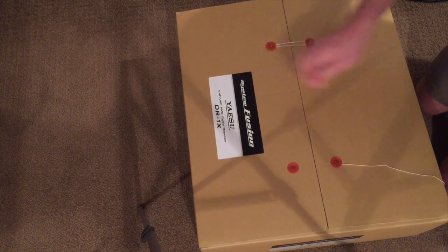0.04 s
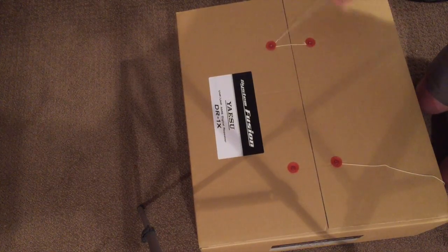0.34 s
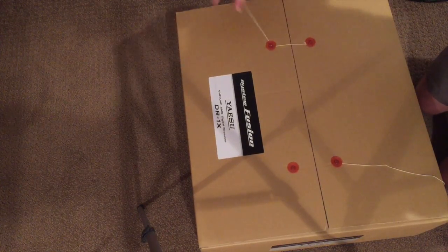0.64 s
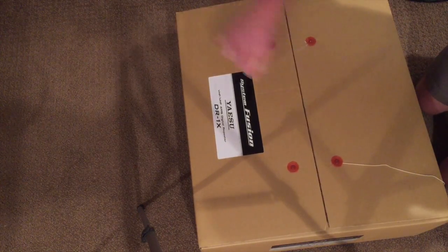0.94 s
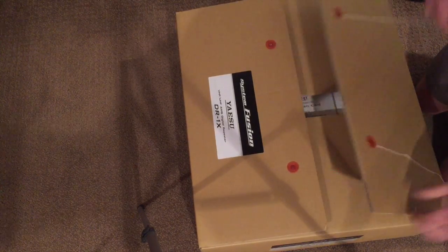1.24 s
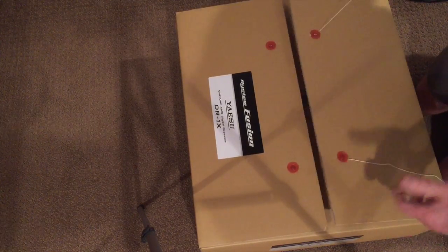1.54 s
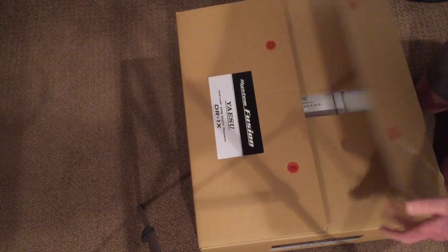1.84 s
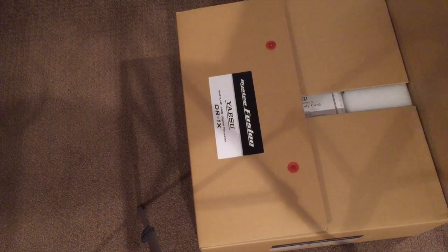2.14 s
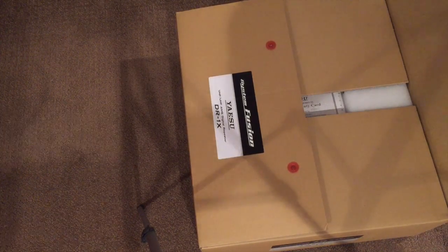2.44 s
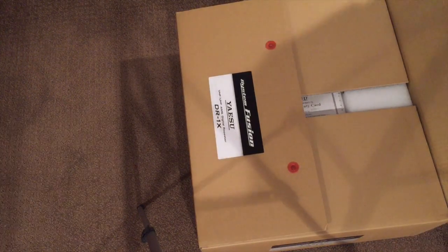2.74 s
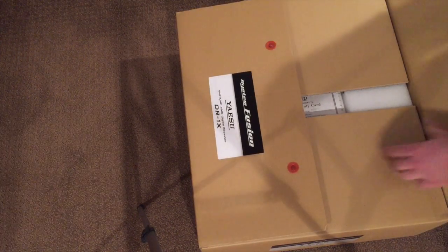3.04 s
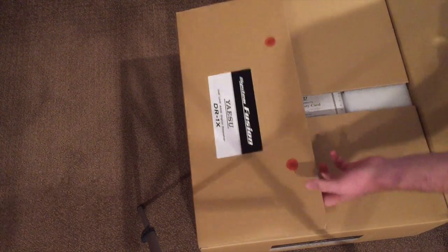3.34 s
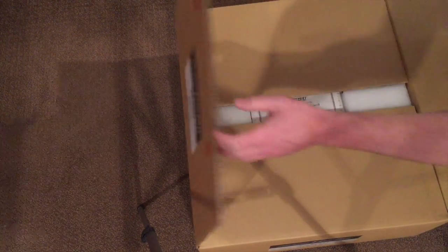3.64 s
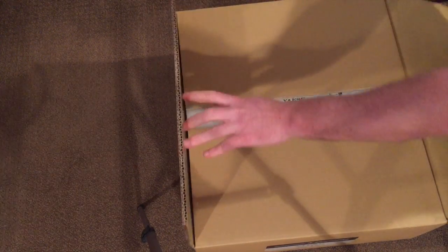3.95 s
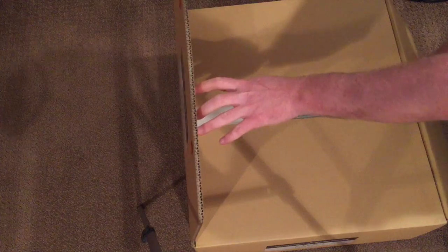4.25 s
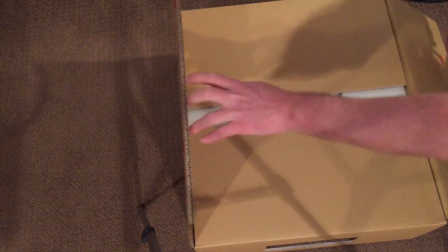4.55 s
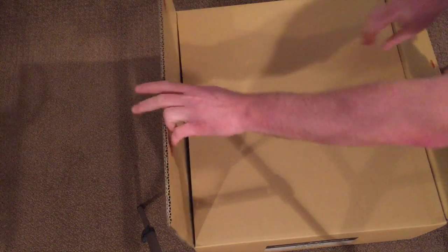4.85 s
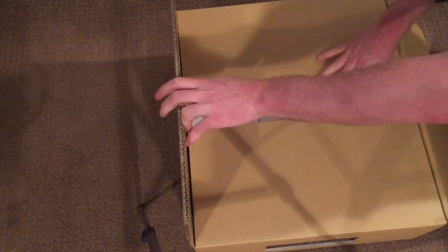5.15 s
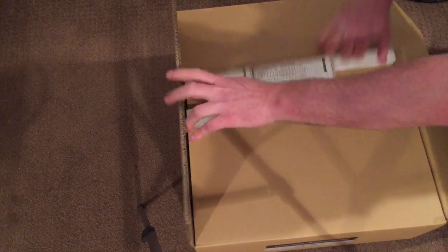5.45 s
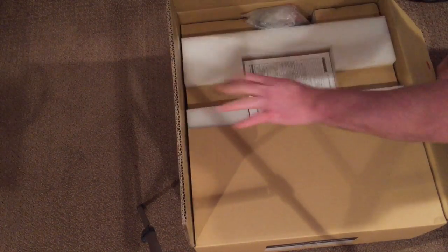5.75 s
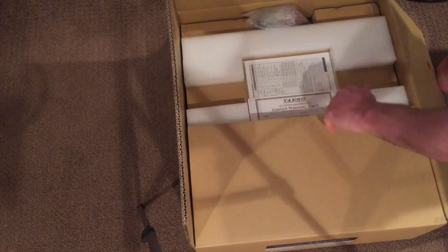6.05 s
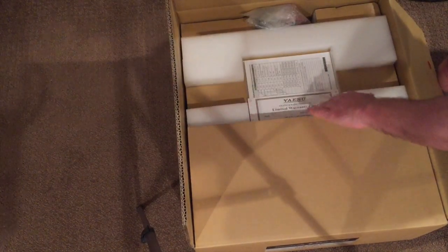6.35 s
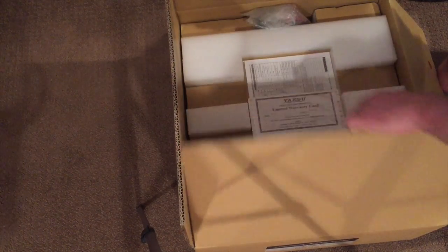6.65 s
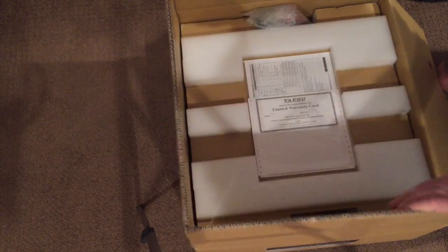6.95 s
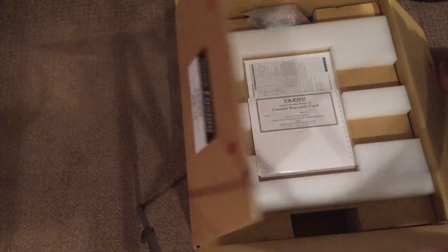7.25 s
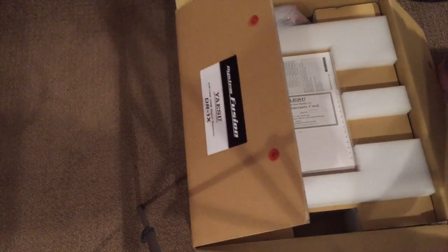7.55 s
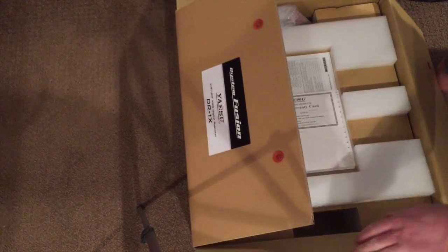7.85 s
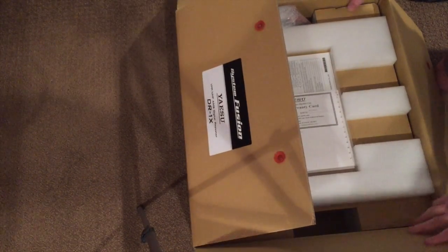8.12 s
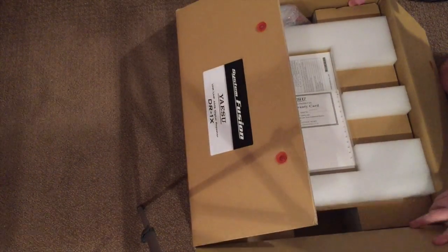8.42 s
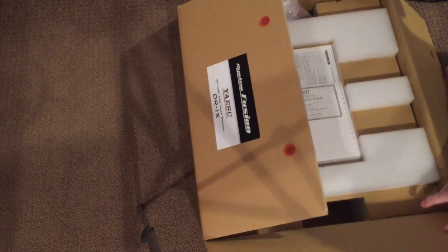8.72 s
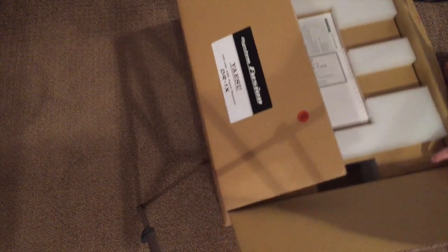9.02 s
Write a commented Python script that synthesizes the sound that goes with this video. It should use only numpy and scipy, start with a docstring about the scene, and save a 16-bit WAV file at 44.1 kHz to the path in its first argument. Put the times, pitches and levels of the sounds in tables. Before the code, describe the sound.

A string snaps against a cardboard lid, then the box's flaps are pulled back, rasping, sliding and thumping up close.

```python
"""Opening a cardboard box

A small carpeted room, one microphone close to a large corrugated box on the floor. A string is
unwound from its button and snaps against the lid; four flaps are pulled back one by one. Sliding
board rasps and hisses; hands and flap edges knock, ringing the flaps and walls. The foam packing
sticks and slips in one squeak, and near the end a cut edge drags over the next flap."""
import sys
import numpy as np
from scipy import signal
from scipy.fft import rfft, irfft
from scipy.io import wavfile
from scipy.ndimage import uniform_filter1d

SR = 44100
rng = np.random.default_rng(int(sys.argv[2]) if len(sys.argv) > 2 else 0)


def master(y):
    """Save y as 16-bit WAV."""
    cut = np.clip(np.atleast_2d(y).T, -1, 1)
    pcm = np.round(cut * 32767)  # scale
    wavfile.write(sys.argv[1], SR, pcm.astype(np.int16))


N = 409248
TIME = np.arange(N) / SR

# Levels are relative: each source applies its own trims.
# strokes of sliding board: start/s, length/s, attack/s, release/s, swell/dB, drone/dB, rasp/dB, hiss/dB
STROKES = [ (0, 0.073, 0.0018, 0.085, -13, -50, -68.5, -67),
           (0.118, 0.13, 0.041, 0.06, -2, -58.5, -61, -65),
           (0.583, 0.086, 0.054, 0.034, 10.5, -61.5, -63, -67),
           (0.767, 0.098, .015, 0.027, 3, -69.5, -62.5, -71), (1.106, 0.2, .01, .05, 1, -57.5, -80, -87),
           (1.328, 0.17, 0.0086, 0.069, -16, -47.5, -54, -60.5),
           (1.473, 0.11, 0.0081, 0.091, 2, -45.5, -70, -66),
           (1.986, .14, 0.017, 0.013, -1.5, -63, -63, -61.5),
           (2.105, .18, 0.042, 0.05, 7, -61, -52.5, -52.5), (2.262, 0.45, .02, 0.04, 3, -63, -63, -57.5),
           (2.647, 0.41, 0.063, 0.019, -9.5, -64, -60.5, -55),
           (2.959, 0.29, 0.012, 0.085, -28.5, -56, -67, -69),
           (3.211, 0.2, 0.011, 0.015, -0.5, -46.5, -59, -61),
           (3.342, 0.19, 0.0093, 0.057, -7.5, -54, -53.5, -58.5),
           (3.46, 0.21, .02, .01, 9, -64, -64, -61.5), (3.596, 0.49, .012, 0.026, 12.5, -48, -54.5, -53),
           (4.046, 0.047, .012, 0.025, 7, -36, -42, -36),
           (4.324, 0.11, 0.021, 0.019, -5.5, -68.5, -75, -80.5),
           (4.418, .2, 0.026, 0.026, -4, -55, -66.5, -64.5), (4.589, 0.21, 0.13, 0.13, 6, -40.5, -49, -48),
           (4.83, 0.19, .02, 0.053, -10.5, -58, -66.5, -65),
           (4.919, 0.56, 0.023, 0.04, -19.5, -77, -76.5, -79),
           (5.378, 0.07, 0.023, 0.017, -22, -43, -39, -49),
           (5.424, 0.29, 0.087, 0.036, -2.5, -46.5, -43.5, -41),
           (5.662, 0.17, .02, 0.062, -5.5, -51, -46, -47), (5.89, 0.24, 0.067, 0.07, 2.5, -57, -47, -48.5),
           (6.466, .2, 0.1, 0.057, -14, -49.5, -47.5, -50.5),
           (6.651, 0.095, 0.028, 0.016, 7, -48.5, -52.5, -47.5),
           (6.734, 0.13, 0.01, 0.036, -13, -35.5, -45.5, -48),
           (6.841, 0.28, 0.017, 0.12, 7, -49.5, -47.5, -51.5),
           (7.078, 0.2, 0.0067, 0.015, 12.5, -54, -47, -49.5), (7.23, 0.18, .02, 0.071, -1, -46, -51, -55),
           (7.383, .33, .03, 0.062, -5, -60.5, -69.5, -58.5), (7.665, 0.22, 0.13, 0.11, 7, -54, -60, -53),
           (7.855, 0.61, 0.11, 0.29, 6, -63, -67, -55.5), (8.376, 0.47, 0.012, 0.035, 10, -60, -64.5, -67),
           (8.652, 0.68, 0.48, 0.43, 1, -63.5, -78, -58)]
# hands and flaps meeting the box:
# t/s, touches, contact/ms, thump centre/Hz, thump/dB, flap/dB, clack/dB, crack/dB
KNOCKS = [ (0.143, 1, 2.6, 127, -62, -51, -50, -46), (0.929, 1, 2.1, 118, -68, -78, -73, -57),
          (0.990, 1, 1.7, 114, -42.5, -44, -34.5, -41), (1.11, 1, 1.3, 131, -53.5, -45.5, -47, -64),
          (1.147, 1, 9, 188, -54, -46, -45, -57.5), (1.268, 1, 1.1, 155, -54, -60.5, -54, -62),
          (1.331, 2, 1.1, 185, -41.5, -44, -48.5, -47), (1.374, 1, 4, 170, -46, -63, -63, -42.5),
          (1.405, 1, 1.4, 176, -49.5, -68, -54, -60), (1.485, 1, 0.9, 142, -46, -42.5, -47.5, -45),
          (1.516, 1, 0.69, 138, -43, -51, -50, -36.5), (1.994, 1, 1.4, 124, -55, -67, -73, -58),
          (2.029, 1, 0.95, 92.6, -53.5, -63, -54, -44.5), (2.238, 1, 4.9, 137, -53, -62, -52, -37),
          (2.566, 1, 5.3, 226, -64, -52, -49, -54), (2.616, 1, 1.4, 148, -46.5, -58, -53.5, -54),
          (2.969, 2, .7, 151, -32, -40, -47, -58), (3.218, 1, 1, 185, -57, -58, -57, -57),
          (3.241, 1, 1.5, 224, -51, -42, -46.5, -61), (3.347, 1, 0.81, 109, -39.5, -45.5, -50, -42.5),
          (3.423, 1, 3.2, 137, -51, -50.5, -46.5, -49.5), (3.633, 1, 3.7, 123, -46.5, -43, -40, -42.5),
          (3.68, 1, 1.4, 168, -43.5, -56, -72, -70), (3.857, 1, 0.74, 125, -43, -49, -55, -47),
          (3.896, 1, 1.2, 131, -50, -41.5, -41.5, -30), (4.021, 1, 2, 153, -38, -48, -57, -35),
          (4.068, 3, 1.1, 168, -26.5, -35.5, -35, -31), (4.424, 1, 0.66, 121, -53, -46.5, -58, -73),
          (4.709, 1, 0.85, 127, -46, -36.5, -48, -36), (4.744, 1, 3, 122, -37, -43, -52, -43.5),
          (4.856, 1, 3.7, 150, -63, -52, -65, -91), (5.21, 1, 1.6, 77, -57, -64, -68, -83),
          (5.256, 1, 8.2, 150.4, -70.5, -58, -73.5, -66), (5.335, 1, 4.2, 118, -45.5, -51.5, -48.5, -42),
          (5.378, 1, 6.6, 168, -65, -40, -39.5, -35), (5.408, 1, .6, 171, -36, -34, -35, -25.5),
          (5.436, 1, 1.3, 147, -36.5, -66, -63, -60), (5.667, 1, 9.9, 138, -38, -34.5, -37, -32.5),
          (5.683, 1, 1.1, 129, -37.5, -42, -41, -30), (6.043, 1, 2.6, 133.7, -39, -47, -62, -51),
          (6.077, 1, 1.6, 117, -40, -43, -43, -38.5), (6.449, 1, 5.9, 109, -42.5, -55.5, -66, -65),
          (6.509, 1, 8.2, 97, -48.5, -48, -54, -46.5), (6.738, 2, 3.4, 207, -32.5, -31, -38.5, -61),
          (6.779, 3, 5, 193, -39.5, -41, -34.5, -40.5), (6.84, 1, 1.6, 122, -49, -41, -40.5, -42),
          (6.891, 2, 1.5, 117, -60, -37.5, -39.5, -42), (6.979, 1, 1.9, 204, -50, -30, -35.5, -36),
          (7.036, 1, 1.5, 176, -39.5, -38, -35, -39.5), (7.242, 1, 1.9, 160, -41.5, -33, -27, -23),
          (7.309, 1, 0.8, 184, -54, -58, -35, -35.5), (7.453, 1, 4.2, 185, -52, -48, -41.5, -48.5),
          (8.086, 1, 1, 162, -56.5, -69, -72, -60), (8.189, 1, 3.9, 150, -74, -72, -53.5, -52),
          (8.367, 1, 1.1, 133, -48.5, -68, -67, -60), (8.422, 1, 5.4, 151, -61, -77, -59.5, -53),
          (9.188, 1, 0.76, 210, -58.5, -56.5, -67, -92)]
# noise spectra: f/Hz, level/dB
DRONE_SPECTRUM = [(35, -15.5), (70, 4), (120, -2), (155, 6.5), (215, -5.5), (290, -4.5), (440, -12),
                  (550, -3), (720, -42), (1100, -20)]  # rubbed box walls
RASP_SPECTRUM = [(400, -17), (700, -22.5), (1100, -3.5), (1500, -1.5), (2200, -2.5), (3200, -1.5),
                 (4300, 0), (6500, -9.5), (12000, -38.5)]  # flutes of the board
HISS_SPECTRUM = [(2000, -50), (3500, -5.5), (4600, 0.5), (5800, 4), (7500, -1), (9000, 2.5), (10300, -2),
                 (11500, 0.5), (15000, -4.5)]  # sliding fibres
CRACK_SPECTRUM = [(1100, -16.5), (1800, -7.5), (2600, -4), (4000, -3), (5600, -1.5), (7500, -7.5),
                  (9000, -8.5), (10300, -10), (15000, -14.5)]  # fibres struck or letting go
SNAP_SPECTRUM = [(700, -5), (1500, -2), (2800, -9.5), (4300, -7), (6000, 0), (7200, -11.5), (8300, 1.5),
                 (10300, -10), (15000, -6.5)]  # string hitting the lid
EDGE_SPECTRUM = [(600, -8), (1100, -1.5), (2000, 1), (3300, -0.5), (4500, -3), (6500, -9.5), (12000, -23)]  # dragged cut edge
ROOM_TONE_SPECTRUM = [(20, -15), (55, -2), (170, -8), (300, -12), (700, -17), (1500, -14.5), (4000, -23.5),
                      (15000, -26.5)]  # the quiet room
# resonances of the cardboard: f/Hz, width/Hz, level/dB
FLAP_PEAKS = [(291, 20, 2), (351, 34, 3), (414.4, 49, 0), (541, 99, -2), (602.4, 30, 2.5), (709, 69, -5.5)]  # a single flap bending
BOARD_PEAKS = [(887, 56, -0.5), (1076, 67, 6), (1216, 280, -1.5), (1460, 110, 0), (1597, 130, -5),
               (2040, 390, -3)]  # stiff board near the contact
# ringing modes: f/Hz, level/dB, T60/s
BOX_MODES = [(55.4, -6.5, 0.032), (75.4, -0.5, .11), (100.5, 0, 0.16), (129.4, 1, .11), (158.1, -1.5, 0.19),
             (172.7, -4.5, 0.24), (197.6, 4.5, 0.094), (231.6, -2, 0.15)]  # the walls and the air between them
LID_MODES = [(160, -41, .2), (235, -35, 0.11), (307, -28, .1), (335, -25.5, 0.093), (546, -23, .09),
             (596, -23.5, 0.11), (1107, -24, 0.041), (1560, -35, 0.11), (1852, -29.5, 0.072)]  # the lid under the string
# foam dragged along a flap: t/s, f/Hz, level/dB
SQUEAK_CURVE = [(5.45, 1100, -88), (5.475, 1193, -41), (5.495, 1164, -48), (5.52, 1357, -48),
                (5.55, 1546, -39), (5.575, 1540, -69)]
# one flap's edge on another: t/s, level/dB
EDGE_SLIDE = [(8.57, -75), (8.6, -55.5), (8.66, -63.5), (8.76, -55), (8.86, -56.5), (8.98, -53),
              (9.15, -57.5), (9.21, -73), (9.24, -81)]  # curve of the sliding force
EDGE_CATCHES = [(8.603, -56), (8.612, -59), (8.645, -50), (8.67, -55), (8.678, -46)]  # catches before it runs free
# reflections off nearby flaps and walls: delay/ms, level/dB
NEAR_REFLECTIONS = [(1.1, -30.5), (2.3, -20.5), (3.4, -20), (5.2, -17.5)]


def from_db(db):
    return 10 ** (np.asarray(db) / 20)


def unit_rms(x):
    return x / np.sqrt(np.mean(x ** 2) + 1e-20)


def unit_burst(x, seconds):
    """Scales a burst so that its loudest stretch of this length has rms 1."""
    power = uniform_filter1d(x ** 2, int(seconds * SR), mode="constant")
    return x / np.sqrt(power.max() + 1e-20)


def add(out, start_s, burst):
    i = int(start_s * SR)
    out[i:i + len(burst)] += burst[:N - i]


def in_time(rows):
    """Each column of a curve at every sample."""
    times, *columns = np.transpose(rows)
    return [np.interp(TIME, times, column) for column in columns]


def drift(rate_hz):
    """Smooth random wander; rms 1."""
    return unit_rms(np.interp(TIME * rate_hz, np.arange(4000), rng.standard_normal(4000)))


def colour(x, spectrum):
    """Gives a steady noise a spectrum that falls away past both ends; rms 1."""
    hz, db = np.transpose(spectrum)
    log_hz = np.log(np.arange(N // 2 + 1) * SR / N + 1)
    beyond = np.maximum(np.log(hz[0]) - log_hz, 0) + np.maximum(log_hz - np.log(hz[-1]), 0)
    gain = from_db(np.interp(log_hz, np.log(hz), db) - 20 * beyond)
    return unit_rms(irfft(rfft(x) * gain, N))


def slips(spread_db):
    """Countless tiny slips of paper fibres, uneven in size."""
    return rng.standard_normal(N) * from_db(spread_db * np.clip(drift(400), -2.5, 2.5))


def resonate(x, peaks):
    """Parallel resonances with alternating signs."""
    out = 0
    for k, (hz, width, db) in enumerate(peaks):
        r = np.exp(-np.pi * width / SR)
        gain = (-1) ** k * from_db(db) * (1 - r * r) / 2
        poles = [1, -2 * r * np.cos(2 * np.pi * hz / SR), r * r]
        out = out + gain * signal.lfilter([1, 0, -1], poles, x)
    return out


def soften(x, top_hz):
    """Paper damps short bending waves, so the ringing has a steep upper edge."""
    return signal.sosfilt(signal.butter(4, top_hz, fs=SR, output="sos"), x)


def stroke_gains(settle_db=-20.5, settle_s=0.035):
    """Gains of drone, rasp and hiss: a stroke speeds up, swells or fades, slows; the board settles."""
    power = np.zeros((3, N))
    for start, length, attack, release, swell_db, *levels_db in STROKES:
        t = TIME[:int(length * SR)]
        speeding = np.sin(np.pi / 2 * np.clip(t / attack, 0, 1))
        slowing = np.sin(np.pi / 2 * np.clip((length - t) / release, 0, 1)) ** 2
        tilt_db = swell_db * (t / length - 0.5)
        for layer, db in zip(power, levels_db):
            add(layer, start, (speeding * slowing * from_db(db + tilt_db)) ** 2)
    decay = np.exp(-1 / (settle_s * SR))
    settling = signal.lfilter([1 - decay], [1, -decay], power + 1e-18)
    return np.sqrt(power + from_db(settle_db) ** 2 * settling)


def rubbed_resonances(peaks, patchy_db=6.5):
    """Friction drives resonances, each swelling and fading as the contact travels; rms 1."""
    force = slips(4.7)
    ringing = sum(resonate(force, [peak]) * from_db(patchy_db * drift(20)) for peak in peaks)
    return unit_rms(soften(ringing, top_hz=2400))


def crackle(per_s=70, size_db=4.5, tick_s=0.0008):
    """Single fibres catch and let go with dry ticks; rms 1."""
    catches = rng.random(N) < per_s / SR
    sizes = from_db(size_db * np.minimum(rng.exponential(1, N), 3))
    ticks = signal.lfilter([1], [1, -np.exp(-1 / (tick_s * SR))], catches * sizes + 1e-18)
    return colour(ticks * rng.standard_normal(N), CRACK_SPECTRUM)


def rubbing(judder_db=1.0):
    """Sliding board drives walls and flaps, rasps on the flutes, hisses at the fibres; the grip judders."""
    drone, rasp, hiss = stroke_gains()
    walls = from_db(-4) * colour(slips(1.5), DRONE_SPECTRUM)
    flaps = from_db(-8.5) * rubbed_resonances(FLAP_PEAKS)
    flutes = from_db(-2.5) * colour(slips(1), RASP_SPECTRUM)
    board = from_db(-4) * rubbed_resonances(BOARD_PEAKS)
    fibres = from_db(-0.77) * colour(slips(1), HISS_SPECTRUM) + from_db(-19) * crackle()
    sliding = drone * (walls + flaps) + rasp * (flutes + board) + hiss * fibres
    return sliding * from_db(judder_db * drift(70))


def pulse(t, rise_s, fall_s):
    """Force of a contact: it creeps up as the surfaces meet, then dies away."""
    return 0.5 * (1 + np.tanh(t / rise_s - 0.5)) * np.exp(-np.maximum(t, 0) / fall_s)


def ring(t, modes, gains):
    """Decaying sines, each set off with its own strength."""
    hz, db, t60 = np.transpose(modes)[:, :, None]
    return np.sum(gains[:, None] * from_db(db - 60 * t / t60) * np.sin(2 * np.pi * hz * t), axis=0)


def near_pitch(hz, centre_hz, focus):
    """The place of a blow decides which modes answer most."""
    return 1 / (1 + (focus * np.log2(hz / centre_hz)) ** 2)


def touches(bounce_s=0.018, loss_db=3):
    """Every knock with its bounces: a loose flap lands a little weaker each time."""
    for start, count, contact_ms, thump_hz, *levels_db in KNOCKS:
        for k in range(round(count)):
            yield start + k * bounce_s, contact_ms / 1000, thump_hz, np.array(levels_db) - k * loss_db


def board_clack(t, contact_s, centre_hz, jolt_db=18):
    """A jolt and a noisy push ring the stiff board; contacts longer than 1 ms jolt it less."""
    tap = rng.standard_normal(len(t)) * pulse(t, 1.8 * contact_s, contact_s + 0.0045)
    tap[np.argmin(np.abs(t))] += from_db(jolt_db) / max(1000 * contact_s, 1)
    ringing = sum((-1) ** k * near_pitch(peak[0], centre_hz, focus=1.92) * resonate(tap, [peak])
                  for k, peak in enumerate(BOARD_PEAKS))
    return unit_burst(soften(ringing, top_hz=2100), 0.008)


def box_thump(t, rise_s, centre_hz, scatter_db=3):
    """The walls and the air inside build up after a blow and ring on."""
    mode_hz = np.array(BOX_MODES)[:, 0]
    scatter = from_db(scatter_db * rng.standard_normal(len(mode_hz)))
    gains = scatter * near_pitch(mode_hz, centre_hz, focus=3.29)
    after = np.maximum(t, 0)
    return unit_burst(ring(after, BOX_MODES, gains) * (1 - np.exp(-after / rise_s)), 0.022)


def knocks(lead_s=0.03, lag_s=0.0014):
    """A touch cracks at the surface, bends the flap, then shakes the box: low waves travel slowest."""
    out, t = np.zeros(N), TIME[:SR // 4] - lead_s
    fibres = colour(slips(5.3), CRACK_SPECTRUM)
    scuff = from_db(-15) * np.exp(-np.abs(t) / 0.005)
    for start, contact_s, thump_hz, (thump_db, flap_db, clack_db, crack_db) in touches():
        thump = box_thump(t, contact_s + 3 * lag_s, thump_hz)
        push = rng.standard_normal(len(t)) * pulse(t - lag_s, contact_s, contact_s + 0.0054)
        flap = unit_burst(soften(resonate(push, FLAP_PEAKS), top_hz=1050), 0.013)
        # a hard edge (more crack than flap) clacks higher than a soft hand
        clack = board_clack(t, contact_s, centre_hz=1160 * 2 ** (0.06 * (crack_db - flap_db)))
        grain = np.roll(fibres, -int(start * SR))[:len(t)]
        crack = unit_burst(grain * (scuff + pulse(t, contact_s, contact_s + 0.0034)), 0.0026)
        body = rng.choice([-1, 1]) * from_db(thump_db - 1) * thump + from_db(flap_db) * flap
        surface = from_db(clack_db - 0.8) * clack + from_db(crack_db - 1) * crack
        add(out, start - lead_s, body + surface)
    return out


def string_snap(at_s=0.3407, lead_s=0.003, rebound_s=0.0024):
    """The string slips off its button, the lid springs back; then a crack, a rebound and a rustle."""
    out, t = np.zeros(N), TIME[:SR // 2]
    crack, rebound, rustle = colour(slips(1), SNAP_SPECTRUM)[:3 * len(t)].reshape(3, -1)
    slip = from_db(-36) * rustle[::-1] * pulse(t, 0.00046, lead_s)
    signs = (-1.0) ** np.arange(len(LID_MODES))
    lid = ring(t, LID_MODES, signs) * (1 - np.exp(-t / lead_s))
    add(out, at_s - lead_s, slip + lid)
    add(out, at_s, from_db(-13) * unit_burst(crack * pulse(t, 0.0001, 0.0049), 0.00072))
    add(out, at_s + rebound_s, from_db(-20) * unit_burst(rebound * pulse(t, 0.0001, 0.003), 0.0013))
    add(out, at_s, from_db(-30) * rustle * pulse(t, 0.0046, 0.024))
    return out


def foam_squeak(flutter_db=3.3, waver=0.07):
    """Foam sticks and slips at an unsteady, rising rate."""
    hz, db = in_time(SQUEAK_CURVE)
    sliding = (TIME > SQUEAK_CURVE[0][0]) & (TIME < SQUEAK_CURVE[-1][0])
    level = sliding * from_db(db + flutter_db * drift(150))
    slip_hz = hz * (1 + waver * drift(350))
    return level * np.sin(2 * np.pi * np.cumsum(slip_hz) / SR)


def edge_drag(judder_db=1.0):
    """A cut edge stutters over the next flap, then slides freely with a dull rasp."""
    level_db, = in_time(EDGE_SLIDE)
    sliding = (TIME > EDGE_SLIDE[0][0]) & (TIME < EDGE_SLIDE[-1][0])
    force = sliding * from_db(level_db + judder_db * drift(90))
    catch = unit_burst(pulse(TIME[:SR // 10], 0.00055, 0.0049), 0.0031)
    for start, db in EDGE_CATCHES:
        add(force, start, from_db(db) * catch)
    return force * colour(slips(0.72), EDGE_SPECTRUM)


def room(x, wet_db=-10.5, t60_s=0.24, first_echo_s=0.0037):
    """Nearby boards mirror the short waves; the duller, diffuse echoes of the carpeted room follow."""
    near = x.copy()
    short_waves = signal.sosfilt(signal.butter(1, 900, "high", fs=SR, output="sos"), x)
    for delay_ms, db in NEAR_REFLECTIONS:
        add(near, delay_ms / 1000, from_db(db) * short_waves)
    t = TIME[:SR // 2]
    echoes = rng.standard_normal(len(t)) * from_db(-60 * t / t60_s) * (t > first_echo_s)
    wall_band = signal.butter(1, [200, 8000], "band", fs=SR, output="sos")
    tail = signal.sosfilt(wall_band, echoes / np.linalg.norm(echoes))
    return near + from_db(wet_db) * signal.fftconvolve(x, tail)[:N]


def scene():
    """The box close up over faint room tone, one microphone on both channels."""
    box = room(knocks() + string_snap() + rubbing() + edge_drag() + foam_squeak())
    mono = box + from_db(-74.5) * colour(rng.standard_normal(N), ROOM_TONE_SPECTRUM)
    return np.array([mono, mono])


def record(dry, low_cut_hz=45, high_cut_hz=15500):
    """The microphone loses the deep bass; the top is cut steeply."""
    thin = signal.sosfilt(signal.butter(2, low_cut_hz, "high", fs=SR, output="sos"), dry)
    return signal.sosfilt(signal.ellip(10, 0.2, 80, high_cut_hz, fs=SR, output="sos"), thin)


dry = scene()
out = record(dry)
master(out)
```